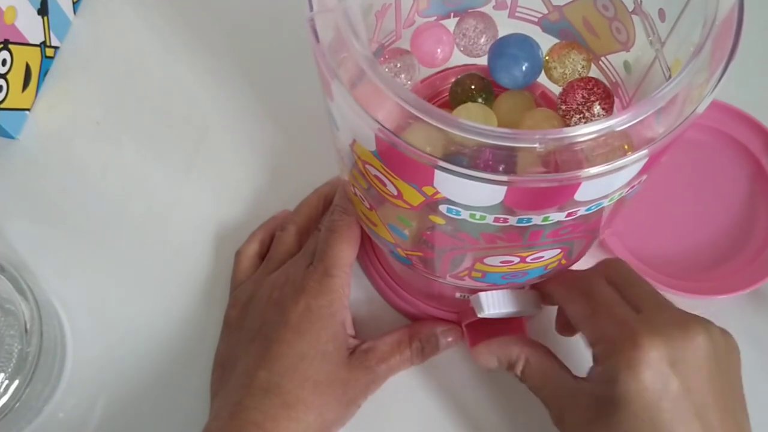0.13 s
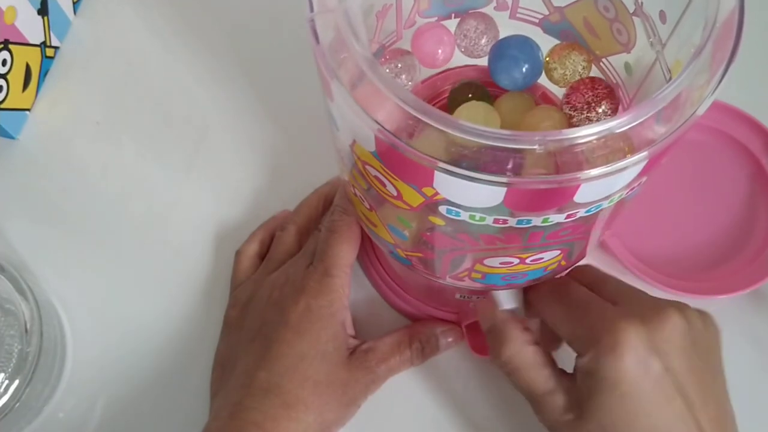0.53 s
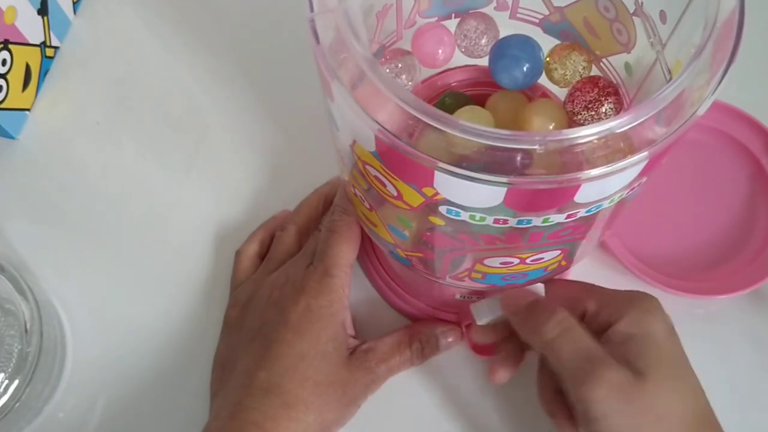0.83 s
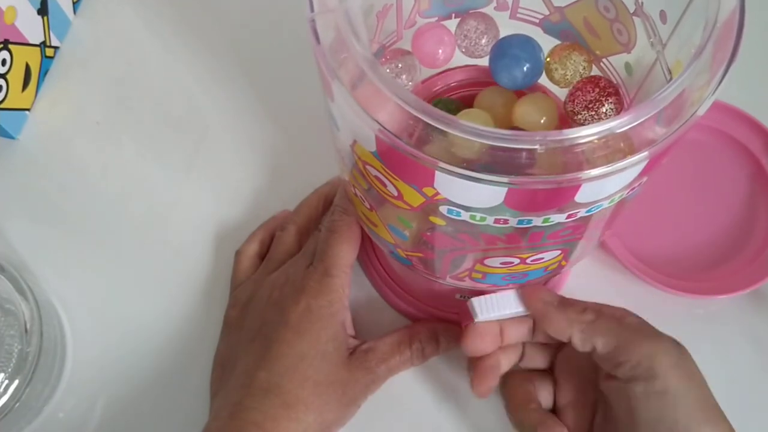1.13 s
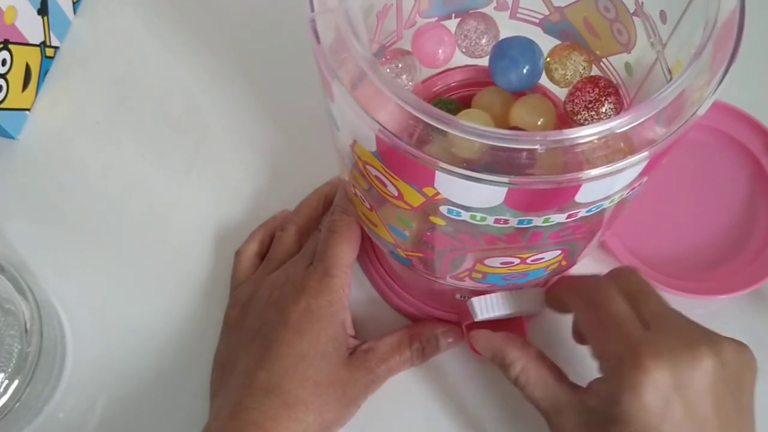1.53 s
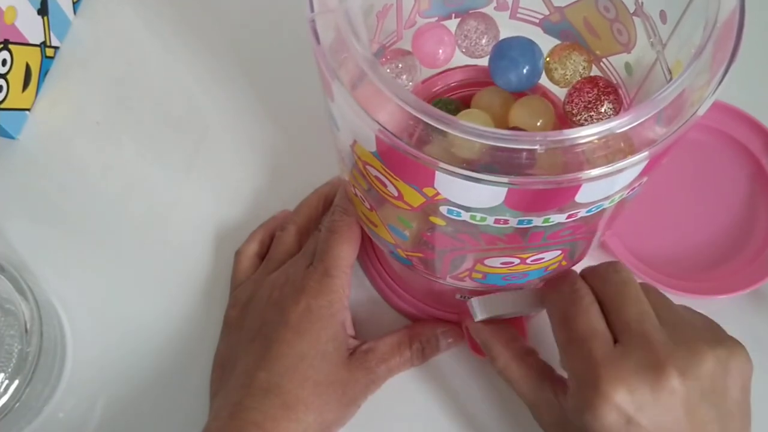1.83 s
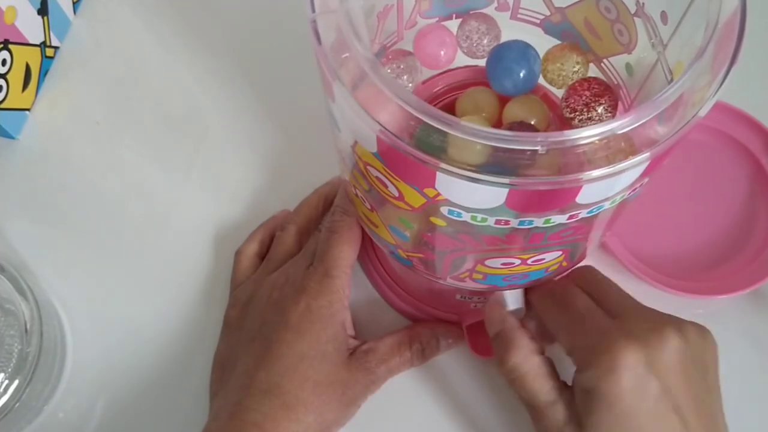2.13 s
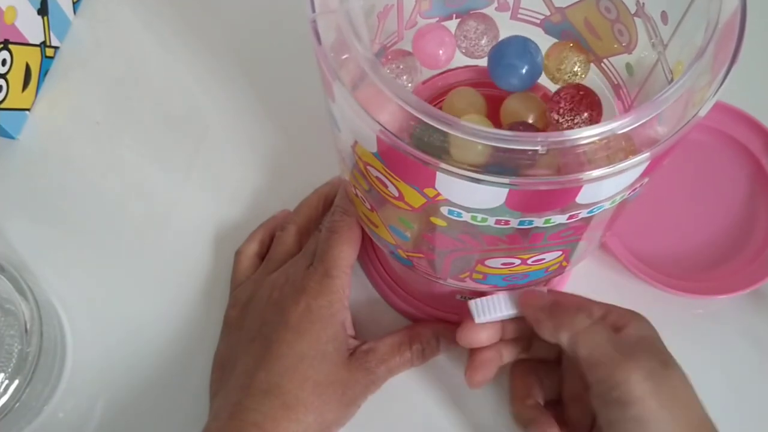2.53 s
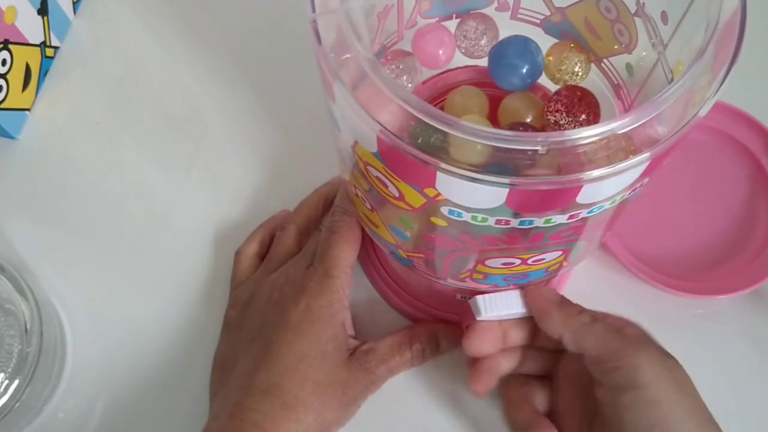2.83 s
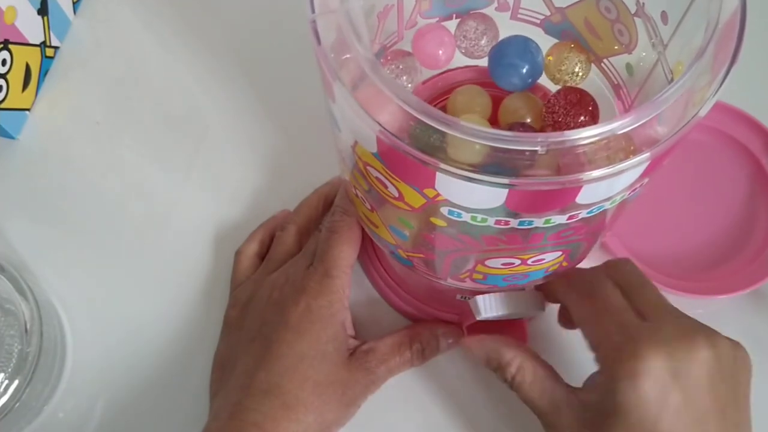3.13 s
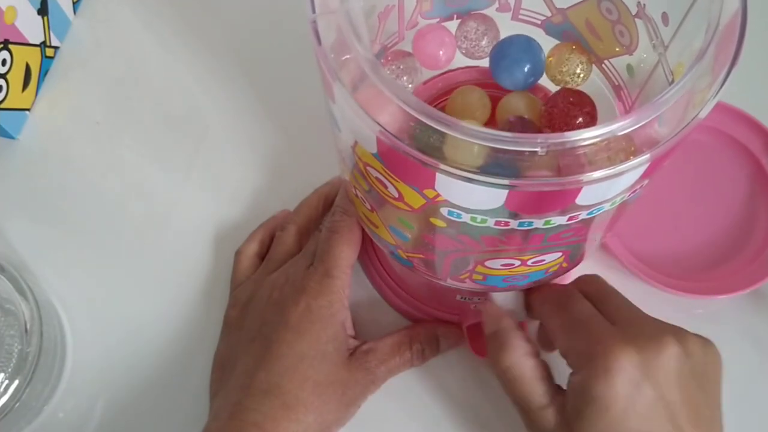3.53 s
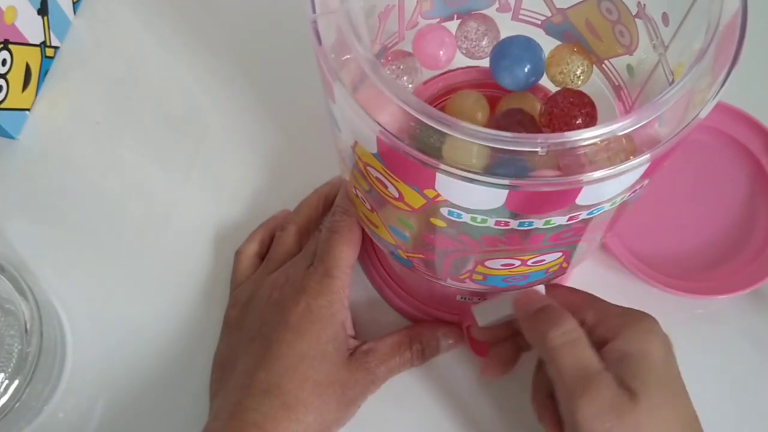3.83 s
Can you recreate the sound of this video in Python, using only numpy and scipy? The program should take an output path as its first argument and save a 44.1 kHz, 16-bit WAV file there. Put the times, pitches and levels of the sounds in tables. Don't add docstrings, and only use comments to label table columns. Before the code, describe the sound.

Fingers brush and tap a ribbed knob, then turn it: seven bright clicks, a pause, eight more, a pause, six more. Close-miked on a table in a small room with short reflections and faint hiss.

```python
import sys
import numpy as np
from scipy import signal
from scipy.fft import rfft, irfft
from scipy.io import wavfile

SR = 44100
rng = np.random.default_rng(int(sys.argv[2]) if len(sys.argv) > 2 else 0)


def store_pcm(level_fs):
    pcm = np.round(np.clip(level_fs, -1, 1) * 32767).astype(np.int16)
    wavfile.write(sys.argv[1], SR, np.atleast_2d(pcm).T)


def invert_db(x):
    u = np.asarray(x, float) / 20
    return 10 ** u


N = 176400


def rms_one(x):
    return x / np.sqrt(np.mean(x ** 2) + 1e-20)


def at_hz(points, hz):
    table_hz, values = np.array(points).T
    return np.interp(np.log(hz), np.log(table_hz), values)


def drift(rate):
    r = np.exp(-80 * np.pi * rate / SR)
    white = rng.standard_normal(N // 40 + 2002)
    slow = rms_one(signal.lfilter([1], [1, -2 * r, r * r], white)[2000:])
    return np.interp(np.arange(N) / 40, np.arange(len(slow)), slow)


def ring(clicks, hz, t60):
    r = invert_db(-60 / (t60 * SR))
    w = 2 * np.pi * hz / SR
    return signal.lfilter([0, np.sin(w)], [1, -2 * r * np.cos(w), r * r], clicks + 1e-18)


def bands(low_hz, high_hz, length, likeness, gain):
    out = 0
    white = rng.standard_normal((2, 2, length + 4000))
    edges = np.geomspace(low_hz, high_hz, int(2 * np.log2(high_hz / low_hz)) + 2)
    for k, (low, high) in enumerate(zip(edges, edges[1:])):
        band_pass = signal.butter(2, [low, high], "band", fs=SR, output="sos")
        mid, side = signal.sosfilt(band_pass, white[k % 2])[:, 4000:]
        hz = np.sqrt(low * high)
        alike = np.clip(likeness(hz), 0, 1)
        out = out + gain(hz) * (np.sqrt(1 + alike) * mid + np.sqrt(1 - alike) * side * [[1], [-1]])
    return out


# (pitch [Hz], level [dB])
HUSH = [(150, -9.5), (260, -15.5), (390, -1.5), (1000, -5), (2000, -10), (4000, -23.5), (9000, -31),
        (15000, -22.5)]
# (pitch [Hz], likeness [0-1])
HUSH_LIKENESS = [(150, 0.26), (500, 0.32), (2000, .2), (8000, .05)]


def hush():
    noise = bands(169, 21000, N, lambda hz: at_hz(HUSH_LIKENESS, hz),
                  lambda hz: invert_db(at_hz(HUSH, hz) + 0.99 * drift(5)))
    return invert_db(-68) * rms_one(noise)


# (pitch [Hz], level [dB])
RUMBLE = [(12, -33), (20, -6), (43, -3), (81, -11.5), (116, -7.5), (151, -19), (170, -23), (220, -54.5),
          (370, -120)]
# (time [s], level [dB])
RUMBLE_LEVEL = [(0.0, -68), (0.32, -71), (0.43, -58.5), (0.62, -66), (0.7, -59), (1.17, -61.5),
                (1.64, -71.5), (1.83, -66), (2.61, -63.5), (2.63, -56), (3.14, -66.5), (3.75, -61),
                (3.78, -64), (4.0, -58)]


def rumble():
    s, db = np.transpose(RUMBLE_LEVEL)
    lumps = bands(8.8, 240, N, lambda hz: .05, lambda hz: invert_db(at_hz(RUMBLE, hz) + 2.5 * drift(24)))
    return invert_db(np.interp(np.arange(N) / SR, s, db)) * rms_one(lumps) * invert_db(np.array([[1.2], [-1.2]]))


# (start [s], length [s], level [dB], brightness [dB per octave])
RUBS = [(0.043, .12, -51, 1.5), (.22, 0.052, -75.5, 5), (0.524, 0.1, -54.5, -2), (1.419, 0.077, -53, 1.3),
        (1.604, 0.15, -65, -0.3), (1.797, 0.077, -60, 0.2), (1.843, .05, -72, 9.5), (1.917, .07, -55, 0),
        (2.024, 0.06, -51.5, -0.5), (2.837, 0.13, -68.5, 3.5), (3.122, 0.098, -60, -0.5),
        (3.286, 0.059, -70.5, 3.5)]
# (pitch [Hz], width [Hz], level [dB])
KNOB = [(645, 170, 5.5), (970, 300, 1.5), (1490, 200, 1.5), (2360, 480, -7.5), (3340, 190, -4),
        (4680, 410, -7), (5940, 590, -17), (8400, 670, -16), (10300, 400, -23.5), (12640, 500, -17.5),
        (14800, 500, -20.5)]
# (start [s], length [s], level [dB], pitch [Hz])
SQUEAKS = [
    (0.092, 0.023, -55.5, 3130),
    (3.15, 0.1, -80.5, 6500),
    (3.3, .06, -78.5, 3820),
    (3.385, 0.088, -70, 2670),
    (3.04, 0.11, -80.5, 2130),
]
GRAINS_PER_S, GRAIN_SPREAD_DB = 900, -0.5
HISS_DB, HISS_TOP_HZ = -20, 5260
RUB_RISE, SQUEAK_RISE = 0.39, 0.25
SQUEAK_WIDTH = 0.073


def fingers():
    t = np.arange(N) / SR
    slips = rng.random((2, N)) < GRAINS_PER_S / SR
    sizes = invert_db(GRAIN_SPREAD_DB * rng.exponential(1, (2, N)))
    mid, side = slips * sizes * rng.choice([-1, 1], (2, N))
    grains = rms_one(mid + 0.62 * side * np.array([[1], [-1]]))

    def band(hz, width_hz):
        t60 = np.log(1000) / np.pi / width_hz
        return ring(grains, hz, t60) * np.sqrt(4 * np.pi * width_hz / SR)

    def swell(start, length, rise):
        angle = np.interp((t - start) / length, [0, np.clip(rise, .05, .95), 1], [0, np.pi / 2, 0])
        return np.sin(angle)

    level_db, tilt = np.full(N, -120.), np.zeros(N)
    for start, length, db, bright in RUBS:
        rub_db = db + 28 * np.log10(swell(start, length, RUB_RISE) + 1e-6)
        tilt = np.where(rub_db > level_db, bright, tilt)
        level_db = np.maximum(rub_db, level_db)

    hiss_band = signal.butter(1, [400, HISS_TOP_HZ], "band", fs=SR, output="sos")
    out = invert_db(level_db + HISS_DB) * signal.sosfilt(hiss_band, grains)
    for k, (hz, width_hz, db) in enumerate(KNOB):
        knob_db = level_db + db - 9 + tilt * np.log2(hz / 2000)
        out = out + (-1) ** k * invert_db(knob_db) * band(hz, width_hz)
    for start, length, db, hz in SQUEAKS:
        out = out + invert_db(db) * swell(start, length, SQUEAK_RISE) * band(hz, SQUEAK_WIDTH * hz)
    return out * invert_db(0.66 * drift(52))


# (pitch [Hz], side share [0-1])
SIDE_SHARE = [(200, 0.34), (370, .3), (550, 0.32), (1000, .5), (2500, 0.97), (5000, 0.45), (12000, 0.32)]
LOW_CUT_HZ = 279


def strike(modes, times, levels_db, colour, pan_db, spread_db, scatter):
    out = np.zeros((2, N))
    at = np.clip(times * SR, 0, N - 1).astype(int)
    for hz, db, t60 in modes:
        draw = rng.standard_normal((len(times), 2 * times.shape[1] + 1))
        size = invert_db(levels_db + db + colour(hz) + spread_db * draw[:, :1])
        if scatter:
            size = size * np.sign(draw[:, 1::2])
        else:
            size = size * np.ones(times.shape)
        side = at_hz(SIDE_SHARE, hz) * draw[:, 2::2]
        clicks = np.zeros((2, N))
        np.add.at(clicks[0], at, size * (1 + side) * invert_db(pan_db / 2))
        np.add.at(clicks[1], at, size * (1 - side) * invert_db(-pan_db / 2))
        out += ring(clicks, hz, t60)
    return signal.sosfilt(signal.butter(3, LOW_CUT_HZ, "high", fs=SR, output="sos"), out)


# (time [s], level [dB])
TAPS = [
    (.055, -61.5),
    (.554, -56.5),
    (2.036, -60),
    (2.872, -66),
    (3.127, -70),
    (3.158, -67),
    (3.195, -73),
]
BASE_SPREAD_DB = 1.6


def finger_taps():
    s, db = np.transpose(TAPS)[:, :, None]
    thump = strike(BASE, s, db + 3.0, lambda hz: 0, 0, BASE_SPREAD_DB, False)
    tick = strike(SHELL[:7], s, db + 2.5, lambda hz: -5.0 * np.log2(hz / 4000), 0, -1, True)
    return thump + tick


# (pitch [Hz], time [s])
ROOM_T60 = [(200, 0.2), (600, 0.22), (1500, 0.24), (4000, 0.25), (9000, 0.23), (15000, 0.19)]
# (pitch [Hz], level [dB])
ROOM_COLOUR = [(200, 8), (370, 4), (600, -6), (1500, 5), (8000, -1.86)]
ROOM_DB, ROOM_ONSET_S, ROOM_LIKENESS = -7, 0.0012, 0.9


def room(x):
    t = np.arange(SR // 2) / SR
    tail = bands(143.7, 14000, len(t), lambda hz: ROOM_LIKENESS,
                 lambda hz: invert_db(at_hz(ROOM_COLOUR, hz) - 60 * t / at_hz(ROOM_T60, hz)))
    tail = tail * (1 - np.exp(-(t / ROOM_ONSET_S) ** 2))
    tail = tail / np.sqrt(np.sum(tail ** 2) / 2)
    return invert_db(ROOM_DB) * signal.fftconvolve(x, tail, axes=1)[:, :N]


# (deep ring [dB], upper base ring [dB], low shell [dB],
# mid shell [dB], high ring [dB], sizzle [dB])
SEATING = [(-1, -1.5, 3.5, -1.3, 1, 2.5), (-3, -1, 1, -1, 1.5, 0.5), (2.2, -0.6, -1, 1, 1.3, -2.5),
           (2.5, 4, -5.5, 0.5, 2.2, 0.5), (-1.5, -1, -1, -0.5, 1.8, -2), (-1.5, 0, 1.3, -0.1, -1.5, -0.2),
           (5.5, -3, 4.5, -4.5, -2.1, 2.5), (-3.5, -3.5, 0.8, 0, -1.5, 1), (-2.5, -0.7, -1, 1, -1, 1),
           (0, -5, 1.5, 5, -2.5, 1.5), (-1, -1.5, 4, 5.5, -2, 3), (2.5, -1, -1.5, 3.5, -0.3, 2),
           (3, 2.5, 1.5, 3.5, -1.5, 3), (1, 1.5, -2.5, 2.5, -0.5, -0.2), (2.5, 2, 7, 5, -5, 0.7),
           (-1.5, 2, 4.5, -0.7, 1, -2.5), (-3, 1.5, 2, -5.5, 1, -2.3), (-2, -4.5, 8, -6, 2, 1),
           (-3, -3.5, 0, -1.5, -1.7, -0.2), (1, 3.5, -3, -1, -2, 0.5), (0.7, 0.7, -1.5, 1.3, 0.6, 1.4)]
GROUP_HZ = [370, 550, 635, 1300, 2300, 3600, 5300, 7500, 13000]


def seating(hz):
    deep, upper, low, mid, high, sizzle = np.transpose(SEATING)
    plain = 0 * deep
    groups = np.array([deep, plain, upper, low, plain, mid, high, plain, sizzle])
    return np.array([np.interp(np.log(hz), np.log(GROUP_HZ), tooth) for tooth in groups.T])[:, None]


# (time [s], snap level [dB], base thump level [dB], left over right [dB],
# brightness [dB per octave])
TEETH = [(0.5807, -9.5, -23, -3, -0.7), (0.668, -10.5, -19.5, -3.5, -0.2), (0.7333, -7, -22, -4.5, 2.5),
         (0.857, -8, -23, -4.5, 1), (0.9775, -10.5, -19, -3.0, 2), (1.1289, -10.5, -21, -3, 4.5),
         (1.2335, -12, -24, -2.5, -1.2), (2.056, -12.5, -21, -2.5, -1.1), (2.1022, -9, -19.5, -3.5, 0),
         (2.2125, -7.5, -18, -2.5, 0.6), (2.3196, -8.5, -20, 2, 1.2), (2.397, -9, -19, -2, 1.5),
         (2.5006, -8, -18, -1.0, 1.45), (2.5921, -7, -19.5, 1, 2.9), (2.7146, -13, -22.5, -2, 2.1),
         (3.52, -12, -23.5, -2, 0.8), (3.5849, -11, -21.5, -2, 2.9), (3.6832, -12, -18, -1, 2),
         (3.784, -8.5, -20.5, -2.5, 1), (3.8675, -7, -20, -2.5, 1.5), (3.9898, -10.5, -22, -2.5, 2)]
# (pitch [Hz], level [dB], fade time t60 [s])
SHELL = [(1359, -19, 0.076), (2430, -18.5, 0.09), (2655, -19, 0.058), (3123, -17.5, 0.06),
         (3478, -11, 0.036), (4024, -11.5, 0.06), (4273, -9, 0.033), (4980, -18, 0.0064),
         (5312, -3.5, 0.027), (5550, -13, 0.013), (7550, -13.5, 0.015), (13400, -11, 0.015),
         (13200, -6, 0.011), (14400, -9.5, .012)]
# (pitch [Hz], level [dB])
CRACK = [(800, -20.5), (1600, -13.5), (2900, -11.5), (5000, -3.5), (6500, -5.5), (11000, -5.5), (14500, -2),
         (17000, -13)]
LEAD_S, LEAD_DB = 0.00053, -26
CHATTER_S, CHATTER_LOSS_DB, CHATTER_SPREAD_DB = .008, 21, 2.5
RATTLE_S, RATTLE_DB, RATTLE_LOSS_DB = .06, -26, 18.5
SHELL_DB, SHELL_RING = -11, 0.62
CRACK_DB, CRACK_T60_S, CRACK_T60_SLOPE, CRACK_SPREAD_DB = -18, 0.015, -0.57, 1.5


def ratchet():
    s, snap_db, _, pan_db, tilt = np.transpose(TEETH)[:, :, None]
    late = rng.random((len(s), 12)) ** 1.4
    loose = rng.random((len(s), 6))
    times = np.hstack([s - LEAD_S, s, s + CHATTER_S * late, s + CHATTER_S + RATTLE_S * loose])
    touch_db = np.hstack([0 * s + LEAD_DB, 0 * s, -CHATTER_LOSS_DB * late,
                          RATTLE_DB - RATTLE_LOSS_DB * loose])
    touch_db = touch_db + CHATTER_SPREAD_DB * rng.standard_normal(times.shape)

    small_hz = np.linspace(800 ** .5, 17000 ** .5, 46) ** 2 * rng.uniform(.99, 1.01, 46)
    small = [(hz, at_hz(CRACK, hz) + CRACK_DB, CRACK_T60_S * (hz / 4000) ** CRACK_T60_SLOPE)
             for hz in small_hz]
    clear = [(hz, db + SHELL_DB, SHELL_RING * t60) for hz, db, t60 in SHELL]
    return strike(small + clear, times, snap_db + touch_db,
                  lambda hz: tilt * np.log2(hz / 4000) + seating(hz), pan_db, CRACK_SPREAD_DB, True)


# (pitch [Hz], level [dB], fade time t60 [s])
BASE = [(213.6, -13.5, 0.19), (301.7, -20.5, 0.041), (369, -6, 0.15), (443, -11.5, 0.051),
        (528.3, -7.5, 0.034), (552.8, -1, 0.071), (632, -1.5, 0.073), (598, -9.5, 0.03), (662, -13, 0.058),
        (851, -18, 0.029)]
BASE_DB, BASE_LAG_S, BASE_JITTER_S = -11, 0.001, 0.00014
PUSH_S, PUSH_DB = [0, 0.001715, 0.003642], [0, 2, -5.5]


def base_thumps():
    s, _, base_db, pan_db, _ = np.transpose(TEETH)[:, :, None]
    pushes = s + BASE_LAG_S + PUSH_S + BASE_JITTER_S * rng.uniform(-1.1, 1, (len(s), 3))
    return strike(BASE, pushes, base_db + BASE_DB + PUSH_DB, seating, pan_db, BASE_SPREAD_DB, False)


# (pitch [Hz], level [dB])
TAIL = [(800, -10.5), (1600, -5), (3000, -2.5), (5000, -4), (6500, -6), (11000, -13), (14500, -8.5)]
TAIL_DB, TAIL_RISE_S, TAIL_LIKENESS, TAIL_SPREAD_DB = -21.5, .0015, 0.35, .8
EARLY_DB, EARLY_T60_S = 8.5, .06


def shell_tail():
    s, snap_db, _, _, tilt = np.transpose(TEETH)

    def dying(hz):
        tooth_db = snap_db + tilt * np.log2(hz / 4000) + seating(hz)[:, 0]
        tooth_db = tooth_db + TAIL_SPREAD_DB * rng.standard_normal(len(s))
        energy = np.full(N, 1e-18)
        energy[(s * SR).astype(int)] = invert_db(2 * tooth_db)
        fall = invert_db(-120 / at_hz(ROOM_T60, hz) / SR)
        early_fall = invert_db(-120 / EARLY_T60_S / SR)
        rise = np.exp(-1 / TAIL_RISE_S / SR)
        early = invert_db(2 * EARLY_DB) * signal.lfilter([1], [1, -early_fall], energy)
        both = signal.lfilter([1], [1, -fall], energy) + early
        swelling = np.sqrt(signal.lfilter([1 - rise], [1, -rise], both))
        return invert_db(TAIL_DB + at_hz(TAIL, hz) + 1.9 * drift(120)) * swelling
    return bands(670, 18000, N, lambda hz: TAIL_LIKENESS, dying) * invert_db(np.array([[-1.1], [1.1]]))


RIGHT_LAG_S = 2.3e-5


def scene():
    soft = base_thumps() + finger_taps() + fingers()
    left, right = ratchet() + soft
    delay = np.exp(-2j * np.pi * np.fft.rfftfreq(2 * N, 1 / SR) * RIGHT_LAG_S)
    near = np.array([left, irfft(rfft(right, 2 * N) * delay)[:N]])
    lasting = shell_tail() + room(soft) + hush() + rumble()
    top_cut = signal.cheby2(16, 50, 16000, fs=SR, output="sos")
    return near + signal.sosfilt(top_cut, lasting)


def roll_off(x):
    return signal.sosfilt(signal.butter(12, 17140, fs=SR, output="sos"), x)


def record(dry):
    rounded = 0.56 * np.tanh(dry / 0.56)
    top_cut = signal.cheby2(16, 60, 17200, fs=SR, output="sos")
    return roll_off(signal.sosfilt(top_cut, rounded))


dry = scene()
out = record(dry)
store_pcm(out)
```